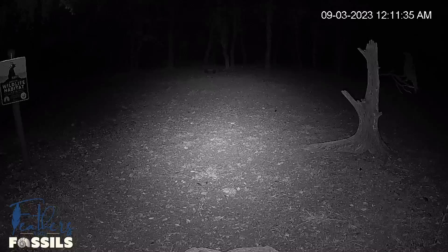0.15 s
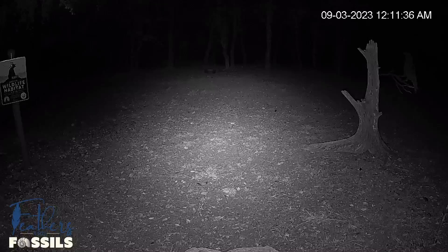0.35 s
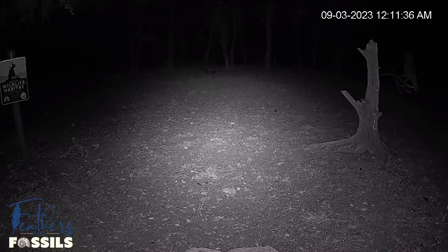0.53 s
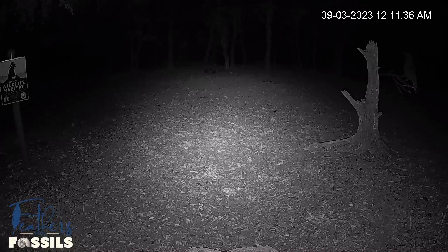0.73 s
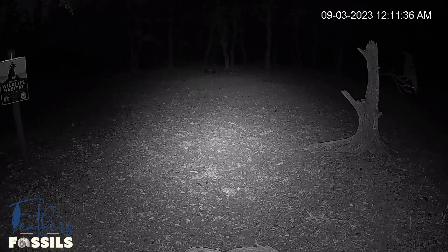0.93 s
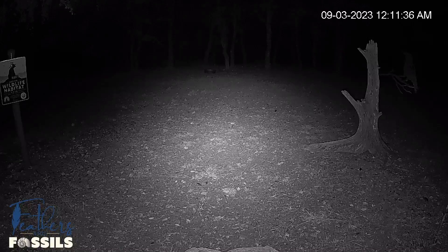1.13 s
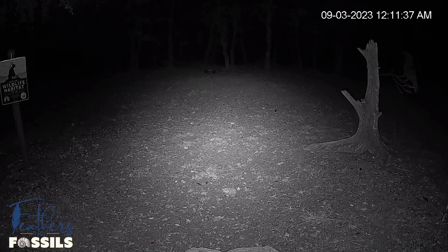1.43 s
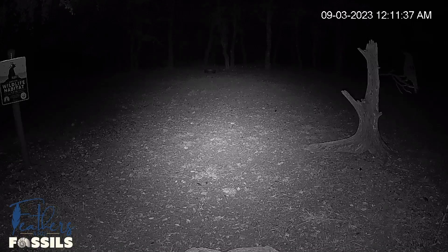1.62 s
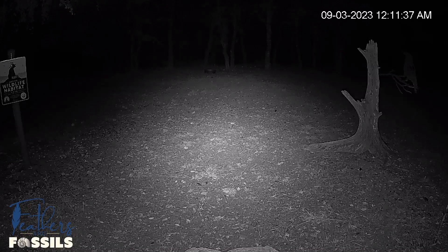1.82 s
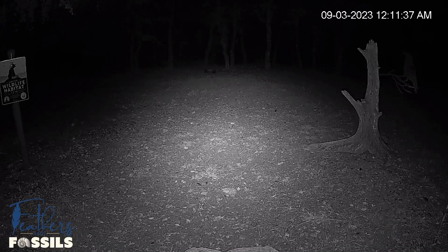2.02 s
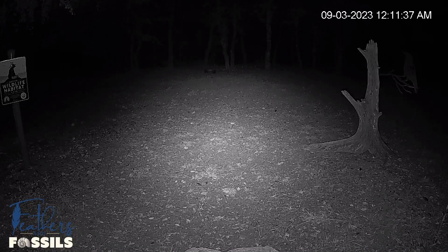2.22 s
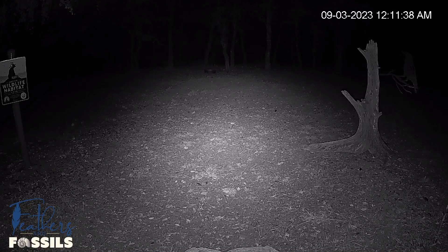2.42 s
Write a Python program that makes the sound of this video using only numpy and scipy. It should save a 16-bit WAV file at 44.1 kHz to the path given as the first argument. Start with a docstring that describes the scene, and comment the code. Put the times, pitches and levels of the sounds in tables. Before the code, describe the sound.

Coyotes howl together at night, one barking then rising into a long wavering wail over crickets

```python
"""A coyote's long howl opens the scene over a cricket's trill, faint insects, a low rumble and hiss.
Another soon barks and rises into a long howl; others hold notes, yap, yip and whine in the night wood.
Coyotes are wavering harmonics with woodland echo, the cricket is a row of short tones, the rest is
coloured noise and steady tones. A trail camera hears it in mono; a short echo and a phase shift
spread it to stereo."""
import sys
import numpy as np
from scipy import signal
from scipy.fft import rfft, irfft, next_fast_len
from scipy.io import wavfile
from scipy.ndimage import uniform_filter1d, map_coordinates

SR = 44100
rng = np.random.default_rng(int(sys.argv[2]) if len(sys.argv) > 2 else 0)


def generate_wav(sig):
    """Save sig (samples, or channels by samples) to the path in sys.argv[1] as 16-bit PCM at SR."""
    pcm = np.round(np.clip(np.atleast_2d(sig).T, -1, 1) * 32767).astype(np.int16)
    wavfile.write(sys.argv[1], SR, pcm)


N = 112896
t = np.arange(N) / SR  # time in seconds


def amp(db):
    """Turn decibels into a gain."""
    return 10 ** (np.asarray(db) / 20)


def unit(x):
    """Scale a sound to an rms level of 1."""
    return x / np.sqrt(np.mean(x ** 2) + 1e-20)


def wobble(rate):
    """A smooth random curve through `rate` random points a second."""
    points = rng.standard_normal(4096)
    return map_coordinates(points, [t * rate], mode="wrap")


def filtered(x, response):
    """Multiply the spectrum of x by a response, which may be complex, at each frequency."""
    size = next_fast_len(N + SR // 2)  # spare room so echoes do not wrap round to the start
    spectrum = rfft(x, size) * response(np.fft.rfftfreq(size, 1 / SR))
    return irfft(spectrum, size)[..., :N]


def rush(spectrum, patchy_db):
    """Coloured noise of rms 1, with random louder and softer patches in time and pitch."""
    grid = signal.stft(rng.standard_normal(N), nperseg=512)[2]
    patches = rng.standard_normal(grid.shape)
    patches = uniform_filter1d(patches, size=4, axis=0)  # smooth across frequency
    patches = uniform_filter1d(patches, size=14, axis=1)  # smooth across time
    noise = signal.istft(grid * amp(patchy_db * unit(patches)))[1][:N]
    hz, db = np.transpose(spectrum)

    def colour(f):
        return amp(np.interp(np.log(f + 1), np.log(hz + 1), db))
    return unit(filtered(noise, colour))


def woods(x, echo_db):
    """Tree trunks scatter sound into a dense fading tail; the total power stays about the same."""
    t60_s, build_s = 0.37, 0.011  # time to fade by 60 dB; time scale of the tail's build-up
    u = t[:SR]
    tail = rng.standard_normal(SR) * amp(-60 * u / t60_s) * (1 - np.exp(-u / build_s))
    scatter = unit(signal.fftconvolve(x, tail)[:N]) * np.std(x)
    return (x + amp(echo_db) * scatter) / np.hypot(1, amp(echo_db))


def coyote(call, rough):
    """A nearly pure voice of three harmonics wavers along its glide, hoarse when low, clearer when high."""
    onset_s, release_s = 0.012, 0.031
    waver, waver_per_s = 0.0022, 35  # pitch unsteadiness as a share, and its speed
    rasp_per_s, rasp_jitter = 220, 0.045  # speed of the roughness; pitch scatter at roughness 1
    flutter_db, flutter_per_s = 8.5, 34  # quick loudness unsteadiness at roughness 1, and its speed
    hoarse, clear_hz, hoarse_span_hz = 0.26, 818, 260  # extra low roughness, gone by the clear pitch
    third_db = -24.5  # third harmonic against the octave

    s, *columns = np.transpose(call)
    hz, first_db, octave_db = [np.interp(t, s, column) for column in columns]
    fade_in = np.clip((t - s[0]) / onset_s, 0, 1)
    fade_out = np.clip(1 - (t - s[-1]) / release_s, 0, 1)

    rough = rough + hoarse * np.clip((clear_hz - hz) / hoarse_span_hz, 0, 1)
    hz = hz * (1 + waver * wobble(waver_per_s) + rough * rasp_jitter * wobble(rasp_per_s))
    phase = 2 * np.pi * np.cumsum(hz) / SR
    voice = amp(first_db) * np.sin(phase)
    voice = voice + amp(octave_db) * np.sin(2 * phase)
    voice = voice + amp(octave_db + third_db) * np.sin(3 * phase)

    flutter = amp(rough * flutter_db * wobble(flutter_per_s))
    rasp = 1 + rough * wobble(rasp_per_s)
    return np.sqrt(2) * fade_in * fade_out * flutter * rasp * voice


def held_howls():
    """Three voices hold long notes: an opening howl, a thin one and a later answer, all with echo."""
    # Pitch and loudness along each howl, before wavering and echo:
    # [start_s, pitch_hz, fundamental_db, octave_db]
    opening = [(0, 802.7, -55.5, -69), (.11, 791, -64.5, -79.5), (.16, 790.7, -52.5, -72),
               (.23, 791, -64, -82), (.3, 781, -57, -65), (.43, 786, -68, -79), (.55, 812, -65, -70.5),
               (.76, 843, -67.5, -61)]
    thin = [(.04, 841, -71.5, -67.5), (.16, 851.5, -92, -69.5), (.3, 842, -76.5, -58),
            (.38, 860, -82.5, -58), (.48, 916, -79.5, -72), (.56, 936, -79, -67), (.73, 971, -75, -73.5),
            (.8, 916, -85.5, -73.5)]
    answer = [(1, 901.3, -67, -54.5), (1.3, 896.5, -72, -61), (1.95, 875.7, -67.5, -72.5),
              (2.58, 869.6, -70.5, -62)]
    howls = woods(coyote(opening, rough=0.13), echo_db=-3)
    howls = howls + woods(coyote(thin, rough=0.073), echo_db=-10)
    return howls + woods(coyote(answer, rough=0.21), echo_db=-10.5)


def background():
    """Low rumble and night hiss are coloured noise; a faint hum and thin far trills are steady tones."""
    # Shape of each noise, before its overall level is set: [pitch_hz, relative_db_per_hz]
    rumble = [(20, -29.5), (30, -10), (40, -2.5), (50, 1.5), (62, 2), (78, 0.5), (100, -6.5), (125, -9.5),
              (170, -21), (220, -38), (480, -79)]
    night = [(150, -17.5), (220, -10.5), (480, -8), (750, -7), (1080, -1), (1400, 3), (1750, -0.5),
             (2200, -2), (2730, 4), (3050, -8.5), (3750, -11.5), (4400, -14.5), (4700, -14.5),
             (7200, -15.5)]
    # Faint steady tones: [pitch_hz, level_db]
    hum = [(296.1, -93.5), (360.7, -84.5)]
    trills = [(2708, -76), (2772, -81.5)]
    rumble_db, night_db = -66, -61
    noise = amp(rumble_db) * rush(rumble, patchy_db=0.5)
    noise = noise + amp(night_db) * rush(night, patchy_db=2.2)
    return noise + tones(hum, drift=0.63) + tones(trills, drift=0.11)


def tones(lines, drift):
    """Steady sine tones whose phase wanders a little (drift in radians)."""
    total = np.zeros(N)
    for hz, db in lines:
        phase = 2 * np.pi * hz * t + drift * wobble(4.4)
        total += np.sqrt(2) * amp(db) * np.sin(phase)
    return total


def cricket(scatter_db=0.2, drift_hz=10, jitter_s=0.00016):
    """Each wing stroke is a short tone that sags in pitch; far crickets blur into one band of noise."""
    # Shape of the far crickets' noise, before its level is set: [pitch_hz, relative_db_per_hz]
    far_crickets = [(3600, -53), (3880, -17.5), (3980, 0.5), (4060, -3.5), (4130, -2), (4220, -1.5),
                    (4330, -36), (4600, -43.5)]
    pitch_hz, sag_hz_per_s = 4036, 9300
    strokes_per_s, first_stroke_s, stroke_width_s = 47.96, 0.0194, 0.0047
    near_db, far_db = -59.5, -70

    strokes = (t - first_stroke_s + jitter_s * wobble(25)) * strokes_per_s
    index = np.round(strokes).astype(int)  # which stroke is nearest
    u = t - first_stroke_s - index / strokes_per_s  # seconds from that stroke's regular centre
    start, size, detune = rng.standard_normal((256, 3))[index].T  # each stroke differs a little
    cycles = start + (pitch_hz + drift_hz * detune) * u - sag_hz_per_s * u ** 2 / 2
    swell = np.exp(-0.5 * ((strokes - index) / strokes_per_s / stroke_width_s) ** 2)
    trill = amp(scatter_db * size) * swell * np.sin(2 * np.pi * cycles)
    near = woods(unit(trill), echo_db=-9)
    return amp(near_db) * near + amp(far_db) * rush(far_crickets, patchy_db=-0.6)


def short_notes():
    """Each short faint note, a yap, a bark's overtone or an echo of the howl's start, arches in pitch."""
    # Middle of each note, with pitch and loudness before wavering and echo:
    # [middle_s, pitch_hz, fundamental_db]
    notes = [(0.253, 997, -61), (0.278, 734.4, -60), (0.303, 1847, -64), (0.343, 1516, -64),
             (0.633, 637, -65), (1.052, 1183, -65.5), (1.059, 1352, -63), (2.079, 1329, -61.5),
             (2.28, 1293, -62.5), (2.389, 1030, -63.5), (2.468, 1300, -62)]
    length_s, arch, octave_db = 0.07, 0.044, -14.5  # arch: share by which the pitch drops at the ends
    total = np.zeros(N)
    for s, hz, db in notes:
        call = []
        for k in (-1, 0, 1):  # start, middle, end
            pitch = hz * (1 - arch * k * k)
            call.append((s + k * length_s / 2, pitch, db - 6 * k * k, db + octave_db))
        total += coyote(call, rough=0.28)
    return woods(total, echo_db=-6.5)


def barking_howler():
    """One voice barks, then glides up into a long howl; the howl carries only a weak echo."""
    # Pitch and loudness along each call, before wavering and echo:
    # [start_s, pitch_hz, fundamental_db, octave_db]
    bark = [(0.24, 522, -72.5, -66), (0.26, 562.7, -56, -75), (0.285, 587, -46, -62),
            (0.305, 629.7, -41.5, -84), (0.325, 608, -57, -66)]
    lead_howl = [(0.425, 466, -66, -78), (0.445, 569.7, -49.5, -79), (0.458, 655.2, -52.5, -71.5),
                 (0.475, 609.5, -44.5, -54), (0.495, 645, -47.5, -74.5), (0.52, 645.3, -49.5, -70),
                 (0.56, 629, -52.5, -64.5), (0.58, 736, -58.5, -61.5), (0.62, 775, -69.5, -54.5),
                 (0.67, 786, -55.5, -61.5), (0.71, 808, -63.5, -51.5), (0.745, 858.5, -68, -55.5),
                 (0.82, 882.4, -69, -59.5), (0.88, 903.3, -61, -56.0), (0.93, 903.2, -59, -66.5),
                 (1.02, 912.6, -55, -57.5), (1.11, 917.6, -65, -58.5), (1.16, 928.6, -51, -57.5),
                 (1.25, 925.0, -55.0, -58.5), (1.31, 917.5, -61.0, -60), (1.39, 929.2, -51.5, -55.5),
                 (1.5, 927, -54, -54.0), (1.56, 935.0, -51.5, -51), (1.6, 916, -48.5, -52.5),
                 (1.65, 920.4, -53, -53.5), (1.73, 914.4, -49, -54.5), (1.81, 907.3, -54.5, -65),
                 (1.86, 916, -51.0, -54.5), (1.93, 905.5, -50.5, -52.5), (2.0, 905.3, -52.5, -53.5),
                 (2.09, 895.3, -52.5, -55), (2.13, 874.3, -66, -51.5), (2.17, 861, -63.5, -56.5),
                 (2.23, 874, -62, -55.5), (2.28, 865.0, -67.5, -62.5), (2.315, 867.4, -78.5, -49),
                 (2.35, 853.0, -73, -65), (2.43, 878.7, -66, -57.5), (2.475, 855.0, -66, -55),
                 (2.5, 860.5, -73.5, -57.5), (2.54, 857.3, -61, -58)]
    barking = woods(coyote(bark, rough=0.19), echo_db=-14)
    return barking + woods(coyote(lead_howl, rough=0.11), echo_db=-18)


def whines():
    """Two whines, one falling and a later one rising in pitch, sound far off through strong echo."""
    # Pitch and loudness along each whine, before wavering and echo:
    # [start_s, pitch_hz, fundamental_db, octave_db]
    falling = [(.75, 743, -60, -76), (.81, 718.7, -62, -69), (.88, 698, -64, -84), (.92, 685, -77.5, -70)]
    rising = [(2.16, 710.4, -60.5, -56), (2.22, 712, -58.5, -71.5), (2.3, 736.5, -63.5, -74),
              (2.39, 765.6, -64.5, -83), (2.58, 831, -73, -78)]
    fall = woods(coyote(falling, rough=0.14), echo_db=-5.5)
    return fall + woods(coyote(rising, rough=0.21), echo_db=-5)


def yip():
    """A higher voice leaps up in pitch, then wavers up and down."""
    # Pitch and loudness along the yip, before wavering and echo:
    # [start_s, pitch_hz, fundamental_db, octave_db]
    yip_call = [(1.14, 964, -64, -78), (1.175, 1017, -57.5, -58), (1.205, 1269, -56, -76),
                (1.235, 1330, -52, -74), (1.275, 1233, -60.5, -71), (1.325, 1251, -58.5, -73.5),
                (1.385, 1353, -51, -87), (1.43, 1330, -54, -72.5), (1.5, 1244, -62, -73.5),
                (1.57, 1233, -66, -66), (1.68, 1208, -65.5, -77.5), (1.77, 1282, -62.5, -69.5),
                (1.84, 1220, -72, -76.5)]
    return woods(coyote(yip_call, rough=0.092), echo_db=-13.5)


def scene():
    """All the sounds add up at one microphone, the same in both channels."""
    pack = held_howls() + short_notes() + barking_howler() + whines() + yip()
    return np.tile(pack + cricket() + background(), (2, 1))


def record(dry):
    """The camera switches on; echo and a quarter-turn spread mono to stereo, and the top is cut."""
    start_s, fade_s, top_hz = 0.035, 0.016, 7300
    delay_s, echo_gain = 0.027, 0.45
    side_db, side_low_hz = -0.73, 143  # side level, and the pitch below which it thins out
    mono = dry.mean(axis=0) * np.clip((t - start_s) / fade_s, 0, 1)

    def echo(f):
        return echo_gain * np.exp(-2j * np.pi * f * delay_s)

    def mid_response(f):
        return 1 + echo(f)

    def side_response(f):
        ratio = (f / side_low_hz) ** 4
        low_cut = ratio / np.hypot(1, ratio)
        return 1j * amp(side_db) * low_cut * (1 - echo(f))  # 1j turns the phase by a quarter

    def top_cut(f):
        return np.clip((top_hz - f) / 100 + 0.5, 0, 1)

    mid = filtered(mono, mid_response)
    side = filtered(mono, side_response)
    return filtered(np.array([mid + side, mid - side]), top_cut)


dry = scene()
out = record(dry)
generate_wav(out)
```